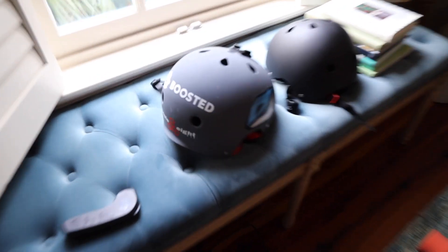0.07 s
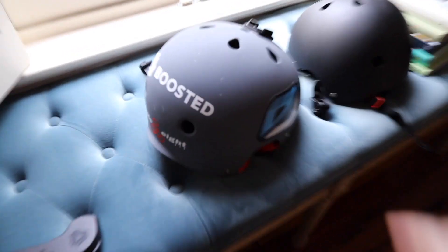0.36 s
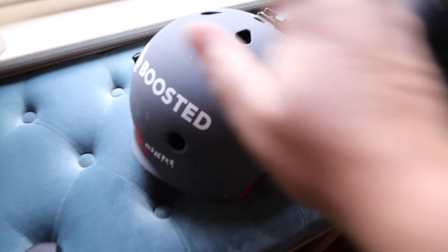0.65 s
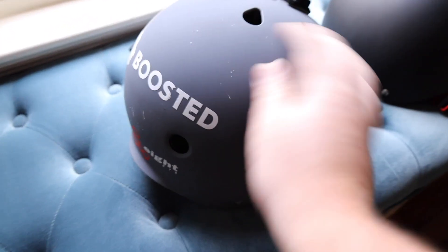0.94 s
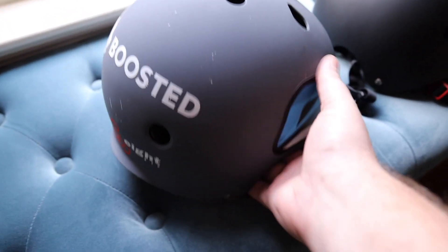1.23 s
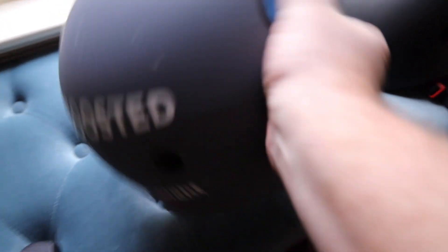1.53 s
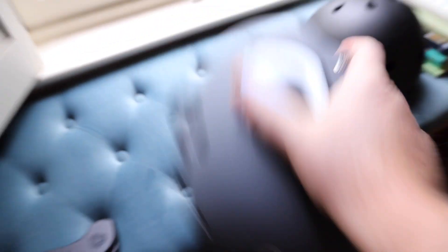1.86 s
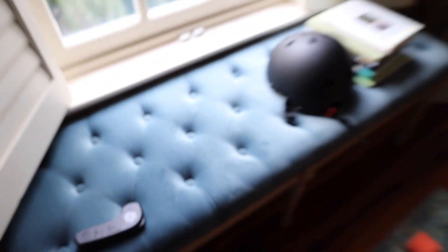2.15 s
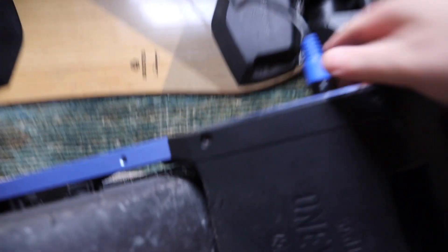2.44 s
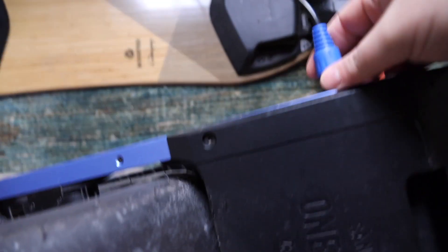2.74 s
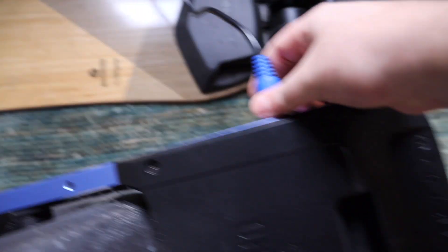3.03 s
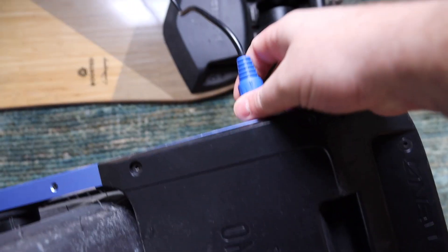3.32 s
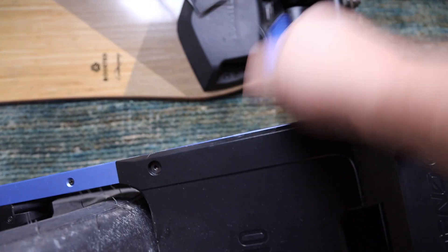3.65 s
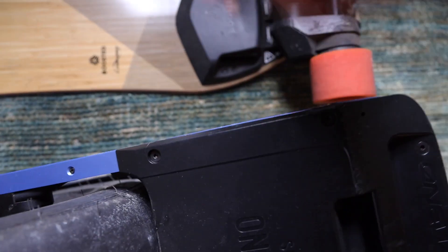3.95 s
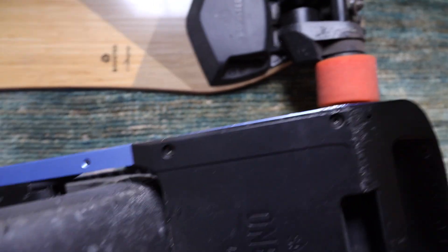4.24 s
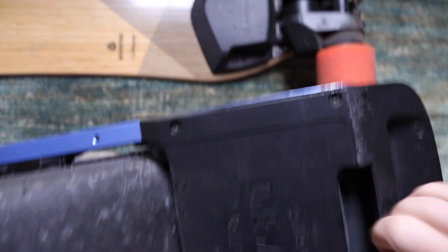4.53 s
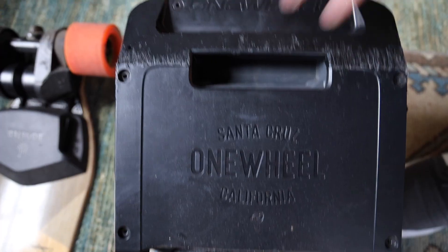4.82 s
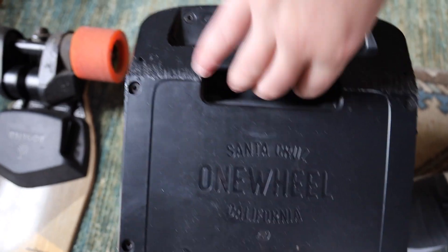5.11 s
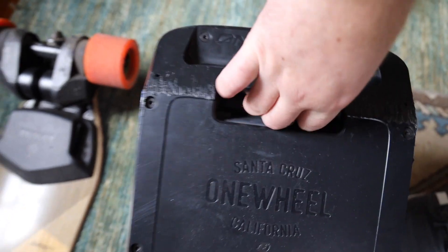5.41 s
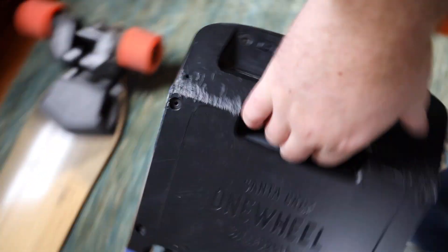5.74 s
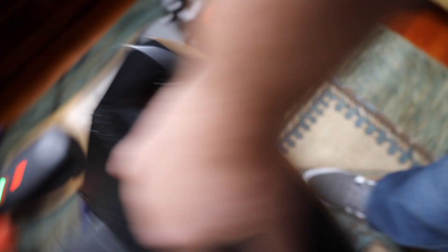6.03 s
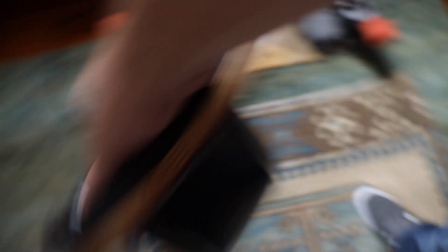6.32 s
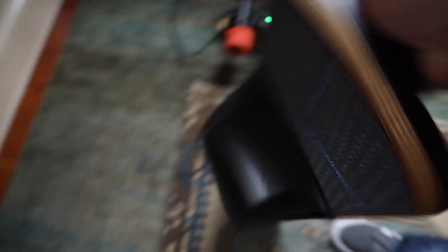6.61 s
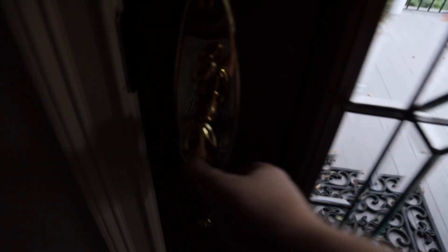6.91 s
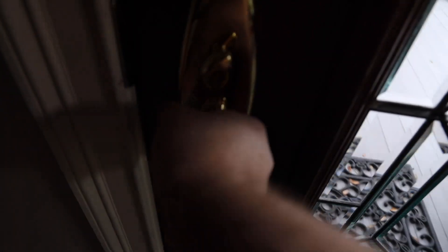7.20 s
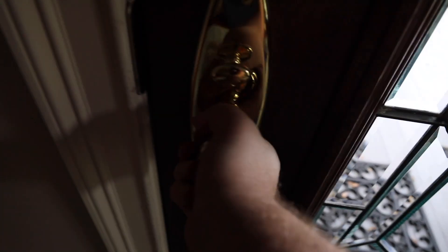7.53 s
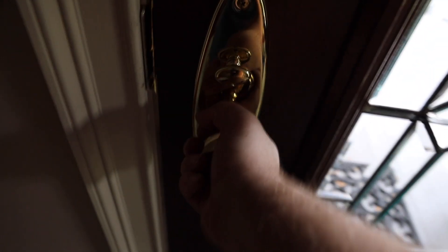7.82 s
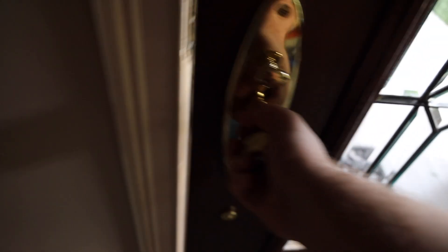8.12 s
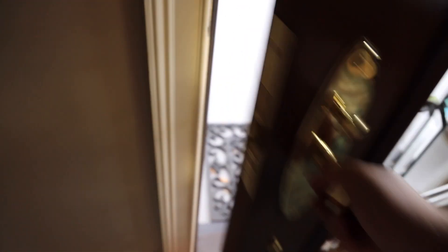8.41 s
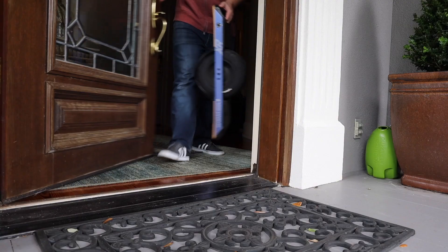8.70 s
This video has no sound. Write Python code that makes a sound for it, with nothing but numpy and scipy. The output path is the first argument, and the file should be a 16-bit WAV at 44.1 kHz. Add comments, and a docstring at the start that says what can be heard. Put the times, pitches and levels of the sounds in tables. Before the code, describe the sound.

A plastic helmet is slapped, a plug snaps out and bounces, a board creaks as it is lifted, and a door latch clacks open.

```python
"""Inside a house, a plastic helmet is slapped and lifted; a charging plug is pulled from an electric
board and dropped. The board's handle sticks and slips, creaking as it is carried over a rug; a front
door is unlatched and swung open. Contacts ring each object's resonances, and rubbing is grainy noise
swelling with each stroke. The microphone is close: the hardest clacks overload it and duck its gain."""
import sys
import numpy as np
from scipy import signal
from scipy.fft import rfft, irfft
from scipy.io import wavfile
from scipy.ndimage import uniform_filter1d

SR = 44100
rng = np.random.default_rng(int(sys.argv[2]) if len(sys.argv) > 2 else 0)


def generate_wav(signal):
    """Clip the signal to [-1, 1] and save it as 16-bit WAV at the path in sys.argv[1]."""
    frames = np.transpose(np.atleast_2d(signal))
    scaled = np.clip(frames, -1, 1) * 32767
    pcm = np.round(scaled).astype(np.int16)
    wavfile.write(sys.argv[1], SR, pcm)


N = 395136
TIME_S = np.arange(N) / SR


def from_db(db):
    """Decibels to gain."""
    return 10 ** (np.asarray(db) / 20)

def unit_rms(x):
    """Scale to rms 1."""
    return x / np.sqrt(np.mean(x ** 2) + 1e-20)

def at_hz(points, hz):
    """Interpolate along log frequency."""
    freqs, values = np.transpose(points)
    return np.interp(np.log(np.maximum(hz, 1)), np.log(freqs), values)

def band(x, low_hz, high_hz, order=3):
    """Butterworth band-pass."""
    return signal.sosfilt(signal.butter(order, [low_hz, high_hz], "band", fs=SR, output="sos"), x)

def coloured(x, spectrum):
    """Impose a spectrum; rms 1."""
    gain = from_db(at_hz(spectrum, np.fft.rfftfreq(N, 1 / SR)))
    return unit_rms(irfft(rfft(x) * gain, N))

def drift(rate_hz):
    """Ramps between Gaussian random values."""
    knots = rng.standard_normal(int(N / SR * rate_hz) + 2)
    return np.interp(TIME_S * rate_hz, np.arange(len(knots)), knots)

def add(out, time_s, sound):
    """Mix in at time_s."""
    start = int(time_s * SR)
    out[start:start + len(sound)] += sound[:N - start]

def body(x, modes, direct):
    """Parallel resonators plus a direct path."""
    out = direct * x
    for hz, width_hz, db in modes:
        r = np.exp(-np.pi * width_hz / SR)
        numerator = np.array([1, 0, -1]) * (1 - r * r) / 2
        denominator = [1, -2 * r * np.cos(2 * np.pi * hz / SR), r * r]
        out = out + from_db(db) * signal.lfilter(numerator, denominator, x)
    return out

def contacts(rows, modes, clatter, t60_s, direct, low_hz, top_db, spread_db=2):
    """A click and dying clatter ring a body. Level: 400-2000 Hz peak; bass, treble relative to it."""
    out, t = np.zeros(N), TIME_S[:SR // 6]
    edges_hz = (low_hz, 400, 2000, 6000, 17000)
    for time_s, level_db, bass_db, treble_db in rows:
        force = clatter * rng.standard_normal(len(t)) * from_db(-60 * t / t60_s)
        force[0] += 1
        # each strike point weights the modes differently
        struck = [(hz, width_hz, db + spread_db * rng.standard_normal()) for hz, width_hz, db in modes]
        ring = body(force, struck, direct)
        bass, middle, treble, top = [band(ring, low, high) for low, high in zip(edges_hz, edges_hz[1:])]
        hit = middle / np.abs(middle).max()
        for part, db, window in ((bass, bass_db, SR // 50), (treble, treble_db, SR // 300),
                                 (top, treble_db + top_db, SR // 300)):
            max_rms = np.sqrt(uniform_filter1d(part ** 2, window, mode="constant").max())
            hit = hit + from_db(db) * part / max_rms
        add(out, time_s, from_db(level_db) * hit)
    return out

def with_bass(rows, bass_db):
    """Give all contacts of one part the same bass share."""
    return [(time_s, level_db, bass_db, treble_db) for time_s, level_db, treble_db in rows]

def friction(spectrum, grains_per_s, grain_gain, uneven_db, uneven_hz=50):
    """Sliding surfaces: hiss and tiny catches under unsteady pressure."""
    catches = (rng.random(N) < grains_per_s / SR) * rng.laplace(size=N)
    force = rng.standard_normal(N) + grain_gain * unit_rms(catches)
    pressure = from_db(uneven_db * drift(uneven_hz))
    return coloured(force * pressure, spectrum)

def strokes(rows, range_db=20, roundness=1.44):
    """Gain of slides that speed up to a crest and slow down; rise and fall each span range_db."""
    power = 0
    for crest_s, db, rise_s, fall_s in rows:
        away = np.maximum((crest_s - TIME_S) / rise_s, (TIME_S - crest_s) / fall_s)
        power = power + from_db(db - range_db * np.minimum(away, 10) ** roundness) ** 2
    return np.sqrt(power)


# house air (time [s], level [dB])
AIR_LEVEL = [(0, -46.5), (2.2, -49.5), (3.3, -52), (5, -48), (7.3, -49.5), (8, -45), (8.96, -46)]
# its spectrum (frequency [Hz], gain [dB])
AIR_SPECTRUM = [(25, -8), (80, -10), (150, -3.5), (350, -2.5), (550, -6), (1000, -11), (2000, -15.5),
                (5000, -25), (16000, -37.5)]
def house_air():
    """Low noise, swelling as the door opens."""
    times_s, levels_db = np.transpose(AIR_LEVEL)
    gain = from_db(np.interp(TIME_S, times_s, levels_db))
    return gain * coloured(rng.standard_normal(N), AIR_SPECTRUM)

# hum tones (frequency [Hz], level [dB])
HUM_TONES = [(150.7, -58.5), (242.2, -54.5), (360.7, -60.5)]
def house_hum(gain_db=-3, waver_db=2, waver_hz=4.3):
    """Faint low tones, wavering slightly."""
    return sum(from_db(db + gain_db + waver_db * drift(waver_hz)) * np.sin(2 * np.pi * hz * TIME_S)
               for hz, db in HUM_TONES)

# rubs on casings (crest [s], level [dB], rise [s], fall [s])
GRIP_STROKES = [(0.09, -42, 0.051, 0.17), (2.76, -41, 0.08, 0.045), (4.814, -38, 0.3, 0.0058),
                (5.27, -33, 0.041, 0.031), (6.54, -43.5, 0.065, 0.13), (6.845, -35, 0.055, 0.14)]
# their spectrum (frequency [Hz], gain [dB])
GRIP_SPECTRUM = [(200, -52), (500, -1.5), (1400, -3), (2500, -10.5), (4400, -14.5), (8000, -29.5),
                 (16000, -50)]
def grip_rub():
    """Hand and clothes rub hard casings."""
    rub = friction(GRIP_SPECTRUM, grains_per_s=1200, grain_gain=0.5, uneven_db=3)
    return strokes(GRIP_STROKES) * rub

# knocks on the board (time [s], level [dB], bass [dB], treble [dB])
BOARD_KNOCKS = [(0.054, -22, -17.5, -32), (5.0735, -12.5, -30, -24.5), (5.447, -22.5, -39, -43),
                (6.135, -26.5, -6, -34), (6.249, -18, -5.5, -41), (6.757, -27, -16, -22.5)]
# its housing (frequency [Hz], width [Hz], gain [dB])
BOARD_MODES = [(447, 59, 27), (650, 125, 23.5), (842, 89, 22.5), (987, 140, 22.5), (1260, 110, 11),
               (3600, 510, 18)]
def board_knocks():
    """The hollow housing is knocked as it is gripped and carried."""
    return contacts(BOARD_KNOCKS, BOARD_MODES,
                    clatter=0.055, t60_s=0.15, direct=0.47, low_hz=70, top_db=-30)

# taps on the helmet (time [s], level [dB], bass [dB], treble [dB])
HELMET_TAPS = [(0.8375, -2.5, -20.5, -15.5), (1.251, -24, -20.5, -12.5), (1.434, -20.5, -30, 7),
               (1.989, -26, -35, -7.5), (2.098, -30.5, -22, -15)]
# its shell (frequency [Hz], width [Hz], gain [dB])
HELMET_MODES = [(209, 52, 8.5), (574, 560, 7.5), (1030, 160, 6), (1650, 850, 6.5), (2870, 460, 17)]
def helmet_taps():
    """A hand slaps the plastic shell, shifts grip and takes it off the bench."""
    return contacts(HELMET_TAPS, HELMET_MODES,
                    clatter=0.1, t60_s=0.05, direct=0.54, low_hz=128, top_db=-19)

# palm scuffs (crest [s], level [dB], rise [s], fall [s])
PALM_STROKES = [(0.94, -35.5, 0.042, 0.13), (1.068, -26.5, 0.091, 0.049), (1.118, -28, 0.022, 0.063),
                (1.16, -28.5, 0.048, 0.1), (1.31, -37.5, 0.08, 0.11), (1.538, -29.5, 0.044, 0.042)]
# shell friction (frequency [Hz], gain [dB])
SHELL_SPECTRUM = [(60, -19), (130, -3), (800, -1.5), (1700, 0), (3100, -1), (5400, -14.5), (16000, -34.5)]
def palm_rub():
    """The palm scuffs over the helmet."""
    rub = friction(SHELL_SPECTRUM, grains_per_s=1900, grain_gain=1.05, uneven_db=2.9, uneven_hz=150)
    return strokes(PALM_STROKES) * rub

# finger skids (crest [s], level [dB], rise [s], fall [s])
SKID_STROKES = [(1.437, -20.5, 0.036, 0.057), (1.487, -19.5, 0.011, 0.017)]
# shell ring (frequency [Hz], width [Hz], gain [dB])
SKID_MODES = [(1820, 820, 2), (2920, 610, -1), (4420, 190, 13)]
def helmet_skids():
    """Fingers skid fast over the lifting shell and ring it."""
    rub = friction(SHELL_SPECTRUM, grains_per_s=3500, grain_gain=0.9, uneven_db=2)
    return strokes(SKID_STROKES) * unit_rms(body(rub, SKID_MODES, direct=1))

# lift-off knock (time [s], level [dB], bass [dB], treble [dB])
HELMET_LIFT = [(1.583, -9.5, -21.5, -13.5)]
# open shell and the air inside (frequency [Hz], width [Hz], gain [dB])
CAVITY_MODES = [(507, 160, 26.5), (940, 210, 18.5)]
def helmet_lift():
    """The helmet leaves the cushion with a hollow knock."""
    return contacts(HELMET_LIFT, CAVITY_MODES,
                    clatter=0.21, t60_s=0.043, direct=0.17, low_hz=195, top_db=-25)

# sleeve passes (crest [s], level [dB], rise [s], fall [s])
SLEEVE_STROKES = [(2.325, -44.5, 0.014, 0.44), (2.55, -48, 0.24, 0.45), (4.72, -40, 0.15, 0.098),
                  (5.1, -52, 0.32, 0.41), (5.263, -42, 0.025, 0.045), (6.22, -46, 0.37, 0.42)]
# their spectrum (frequency [Hz], gain [dB])
SLEEVE_SPECTRUM = [(600, -4), (1300, 3), (3700, 3.5), (8000, -10.5), (16000, -19)]
def sleeve_brush():
    """Cloth brushes past."""
    rub = friction(SLEEVE_SPECTRUM, grains_per_s=2000, grain_gain=0.5, uneven_db=1.3)
    return strokes(SLEEVE_STROKES) * rub

# finger bump (time [s], level [dB], bass [dB], treble [dB])
RIM_BUMP = [(2.5555, -17.5, -6, -30)]
# board rim (frequency [Hz], width [Hz], gain [dB])
RIM_MODES = [(297, 250, -4), (580, 71, 21), (870, 87, 23)]
def rim_bump():
    """Fingers bump the rim while taking the plug."""
    return contacts(RIM_BUMP, RIM_MODES, clatter=0.077, t60_s=0.029, direct=0.13, low_hz=60, top_db=-10)

# plug ticks (time [s], level [dB], treble [dB])
PLUG_TICKS = [(2.916, -26.5, -8.5), (3.309, -22.5, -18), (4.009, -29, -3)]
# plug in its socket (frequency [Hz], width [Hz], gain [dB])
SOCKET_MODES = [(560, 250, 0.5), (1345, 260, 11), (1890, 650, 4), (2840, 1600, 7.5)]
def plug_ticks():
    """The plug is worked loose and carried off."""
    return contacts(with_bass(PLUG_TICKS, -26.5), SOCKET_MODES,
                    clatter=0.11, t60_s=0.047, direct=1.4, low_hz=252, top_db=-15.5)

# release clicks (time [s], level [dB], treble [dB])
PLUG_CLICKS = [(3.730, -13.5, -15), (3.738, 2.5, -6.5), (3.7435, 6, -6.5)]
def plug_snap():
    """The plug snaps out of its socket."""
    return contacts(with_bass(PLUG_CLICKS, -29), SOCKET_MODES,
                    clatter=0.91, t60_s=0.047, direct=0.53, low_hz=208, top_db=-16)

# bounces (time [s], level [dB], treble [dB])
PLUG_BOUNCES = [(4.245, -19, -22), (4.295, 6, -3), (4.317, 3.5, -8), (4.336, 2.5, -9.5),
                (4.471, -7.5, -13.5), (4.546, -12, -12.5), (4.553, -15, -14.5), (4.598, -12.5, -19.5),
                (4.667, -31, -12), (4.745, -24, -9)]
# loose plug (frequency [Hz], width [Hz], gain [dB])
PLUG_MODES = [(287, 46, 7.5), (760, 640, 10), (1870, 450, 14), (3420, 320, 11)]
def plug_drop():
    """The plug lands and bounces to rest."""
    return contacts(with_bass(PLUG_BOUNCES, -24.5), PLUG_MODES,
                    clatter=0.19, t60_s=0.038, direct=0.3, low_hz=25, top_db=-19.5)

# finger slides (crest [s], level [dB], rise [s], fall [s])
HANDLE_STROKES = [(5.05, -35.5, 0.026, 0.18), (5.235, -34, 0.063, 0.2)]
# handle hollow (frequency [Hz], gain [dB])
HANDLE_SPECTRUM = [(300, -28), (650, 0), (1600, 0), (2400, -18), (9000, -47)]
def handle_rub():
    """Fingers slide into the board's handle."""
    rub = friction(HANDLE_SPECTRUM, grains_per_s=730, grain_gain=0.35, uneven_db=5.5)
    return strokes(HANDLE_STROKES) * rub

# weight shifts (crest [s], level [dB], rise [s], fall [s])
RUMBLE_STROKES = [(5.39, -36, 0.4, 0.53), (5.81, -27.5, 0.089, 0.075), (6.11, -30.5, 0.32, 0.52),
                  (6.87, -39, 0.069, 0.11), (7.035, -38, 0.043, 0.041)]
# their spectrum (frequency [Hz], gain [dB])
RUMBLE_SPECTRUM = [(25, -38), (90, -17), (145, -6.5), (330, -12), (1000, -28.5), (2500, -67)]
def board_rumble():
    """The board rumbles as its weight shifts."""
    rub = friction(RUMBLE_SPECTRUM, grains_per_s=1300, grain_gain=0.83, uneven_db=2.5)
    return strokes(RUMBLE_STROKES) * rub

# two creaks, each at start, turn and end (time [s], slip interval [s], level [dB])
CREAKS = [
    [(5.532, .0108, -16), (5.612, .026, -5), (5.675, .008, -8)],
    [(5.778, .030, -22), (5.815, .011, -19), (5.905, .023, -19.5)],
]
def handle_creak(bass_db=-30, treble_db=-26.5, dulling=0.38, cutoff_hz=5400):
    """Stick-slip of the loaded handle knocks the housing; strong slips move it all and sound duller."""
    slips = []
    for creak in CREAKS:
        times_s, intervals_s, levels_db = np.transpose(creak)
        time_s = times_s[0]
        while time_s <= times_s[-1]:
            db = np.interp(time_s, times_s, levels_db)
            slips.append((time_s, db, bass_db, treble_db - dulling * db))
            time_s += np.interp(time_s, times_s, intervals_s)
    knocks = contacts(slips, BOARD_MODES, clatter=0.1, t60_s=0.022, direct=0.1, low_hz=200, top_db=-40)
    return signal.sosfilt(signal.butter(6, cutoff_hz, fs=SR, output="sos"), knocks)

# steps on the rug (time [s], level [dB])
STEPS = [(6.851, -41), (6.911, -39)]
def footfalls(swell_s=0.013):
    """A sole settles softly; the floor thuds."""
    out, t = np.zeros(N), TIME_S[:SR // 3]
    for time_s, db in STEPS:
        force = rng.standard_normal(len(t)) * t * np.exp(-t / swell_s)
        thud = band(force, 46, 103, order=2)
        add(out, time_s, from_db(db) * thud / np.abs(thud).max())
    return out

# lever notches (time [s], level [dB], treble [dB])
LEVER_CLICKS = [(7.207, -5, -26), (7.361, -6.5, -13), (7.415, -9.5, -11), (7.441, -8.5, -8),
                (7.469, -11.5, -11)]
# wooden door panels (frequency [Hz], width [Hz], gain [dB])
PANEL_MODES = [(332.7, 15, 19), (395.3, 19, 20.5), (512, 21, 18.5)]
# lock and strike plate (frequency [Hz], width [Hz], gain [dB])
LOCK_MODES = [(770, 380, 22.5), (1010, 50, 23), (1249, 86, 22), (1850, 740, 15.5), (2630, 170, 17),
              (3086, 85, 16.5), (4850, 150, 9)]
def lever_clicks():
    """The thumb lever goes down notch by notch, ringing lock and door."""
    return contacts(with_bass(LEVER_CLICKS, -22), PANEL_MODES + LOCK_MODES,
                    clatter=0.11, t60_s=0.04, direct=0.13, low_hz=187, top_db=-21)

# lock ticks (time [s], level [dB], treble [dB])
BRASS_TICKS = [(7.228, -30.5, -5.5), (7.356, -33, -22), (7.602, -19, -3), (7.779, -33, 2), (8.438, -39, 3)]
# loose brass handle (frequency [Hz], width [Hz], gain [dB])
BRASS_MODES = [(1080, 440, 16), (2100, 160, 12), (2870, 170, 23), (3790, 250, 15), (5040, 79, 5.5)]
def brass_ticks():
    """The lock's brass parts touch lightly."""
    return contacts(with_bass(BRASS_TICKS, -5.5), BRASS_MODES,
                    clatter=0.42, t60_s=0.043, direct=9.8, low_hz=306, top_db=-8)

# latch impacts (time [s], level [dB], treble [dB])
LATCH_CLACKS = [(7.508, 3.5, -14.5), (7.518, 4.5, -6), (7.533, 3.5, -11.5), (7.577, 7, -8),
                (7.583, 4, -5.5)]
def latch_clacks():
    """The latch lets go; the door jumps in its frame."""
    return contacts(with_bass(LATCH_CLACKS, -16.5), PANEL_MODES + LOCK_MODES,
                    clatter=0.53, t60_s=0.073, direct=0.26, low_hz=185, top_db=-16)

# ringing lock parts (time [s], frequency [Hz], level [dB], t60 [s])
LOCK_PINGS = [(7.5111, 8610, -10, 0.093), (7.515, 5000, -8, 0.066), (8.437, 7300, -34, 0.052)]
def lock_pings():
    """Struck springs and brass plates ring on."""
    out, t = np.zeros(N), TIME_S[:SR // 3]
    for time_s, hz, db, t60_s in LOCK_PINGS:
        add(out, time_s, from_db(db - 60 * t / t60_s) * np.sin(2 * np.pi * hz * t))
    return out

# door rubs (crest [s], level [dB], rise [s], fall [s])
SWEEP_STROKES = [(7.73, -21.5, 0.48, 0.068), (8.06, -37.5, 0.6, 0.39), (8.46, -33.5, 0.21, 0.2),
                 (8.6, -30.5, 0.16, 0.24), (8.93, -33.5, 0.3, 0.35)]
# their spectrum (frequency [Hz], gain [dB])
SWEEP_SPECTRUM = [(80, -30), (170, 0.5), (450, 7), (1100, 2), (2500, -7), (5300, -18.5), (8000, -36),
                  (16000, -75)]
def door_sweep():
    """Friction on frame and sill drives the panels."""
    rub = friction(SWEEP_SPECTRUM, grains_per_s=590, grain_gain=0.5, uneven_db=1.5)
    return strokes(SWEEP_STROKES) * unit_rms(body(rub, PANEL_MODES, direct=12))

# door knocks (time [s], level [dB], bass [dB], treble [dB])
DOOR_KNOCKS = [(8.111, -21, -5, -12), (8.269, -22, -32, -30), (8.283, -18, -32, -10),
               (8.368, -21.5, -32, -16.5), (8.553, -13.5, -27, -13), (8.574, -13.5, -30, -6.5),
               (8.579, -11.5, -32, -4), (8.889, -20.5, -12.5, -12)]
def door_rattle():
    """Panels and handle rattle as the door swings."""
    return contacts(DOOR_KNOCKS, PANEL_MODES + BRASS_MODES,
                    clatter=0.77, t60_s=0.044, direct=1.5, low_hz=158, top_db=-27)

# room decay (frequency [Hz], t60 [s])
ROOM_T60 = [(120, 0.95), (500, 0.62), (3500, 0.56), (14000, 0.5)]
def room(x, build_s=0.0013, dull_hz=6500):
    """Diffuse reflections build fast and die sooner in the treble."""
    t, edges_hz, echo = TIME_S[:SR], np.geomspace(130, 18000, num=9), 0
    for low, high in zip(edges_hz, edges_hz[1:]):
        hz = np.sqrt(low * high)
        decay = from_db(-60 * t / at_hz(ROOM_T60, hz))
        echo = echo + band(rng.standard_normal(SR), low, high) * decay / np.hypot(1, hz / dull_hz)
    echo = echo * (1 - np.exp(-t / build_s))
    return signal.fftconvolve(x, echo / np.sqrt(np.sum(echo ** 2)))[:N]

def smooth_room(x, mix_hz=320, spread_rad=1.2):
    """Two reverbs share the sound in a fast random mix, so the tail is smooth rather than ringing."""
    mix_rad = spread_rad * drift(mix_hz)
    return room(x * np.cos(mix_rad)) + room(x * np.sin(mix_rad))

def scene():
    """Close handling and its reflections, plus steps, air and hum; mono."""
    # (sound, room send [dB])
    parts = [(helmet_taps() + helmet_lift(), -19),
             (plug_ticks(), -20), (plug_snap(), -10), (plug_drop(), -9.5),
             (board_knocks() + handle_creak(), -17),
             (lever_clicks(), -18), (latch_clacks(), -13.5), (brass_ticks() + lock_pings(), -18),
             (rim_bump(), -20), (door_rattle(), -11),
             (palm_rub() + helmet_skids() + sleeve_brush() + grip_rub(), -18),
             (handle_rub() + door_sweep() + board_rumble(), -18)]
    near = sum(sound for sound, _ in parts)
    sent = sum(sound * from_db(send_db) for sound, send_db in parts)
    return (near + house_air() + smooth_room(sent) + footfalls() + house_hum())[None]

def record(dry, threshold_db=-4, release_db_per_s=85, attack_s=0.004, stopband_hz=16800):
    """A limiter ducks on loud clacks and recovers; overshoot is clipped, then all is low-passed."""
    over_db = np.maximum(20 * np.log10(np.abs(dry[0]) + 1e-9) - threshold_db, 0)
    release_db = release_db_per_s * TIME_S
    held_db = np.maximum.accumulate(over_db + release_db) - release_db
    pole = np.exp(-1 / (attack_s * SR))
    duck_db = signal.lfilter([1 - pole], [1, -pole], held_db)
    clipped = np.clip(dry * from_db(-duck_db), -1, 1)
    return signal.sosfilt(signal.cheby2(14, 60, stopband_hz, fs=SR, output="sos"), clipped)


dry = scene()
out = record(dry)
generate_wav(out)
```